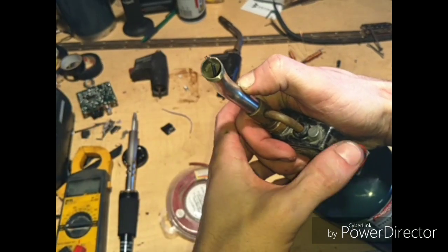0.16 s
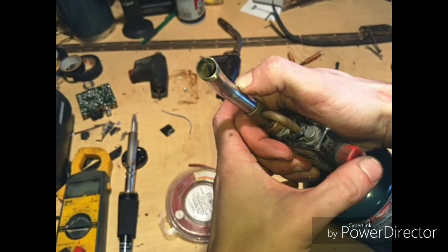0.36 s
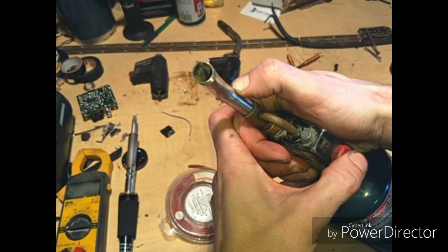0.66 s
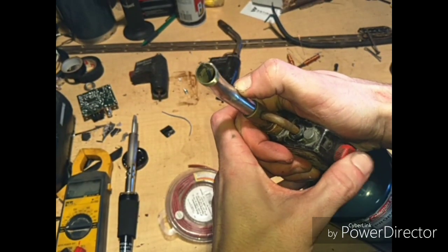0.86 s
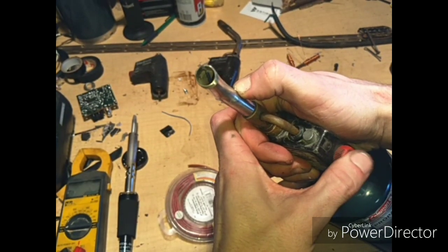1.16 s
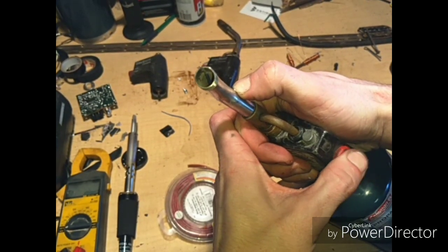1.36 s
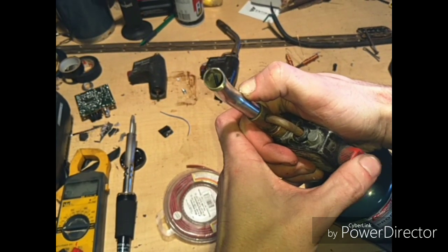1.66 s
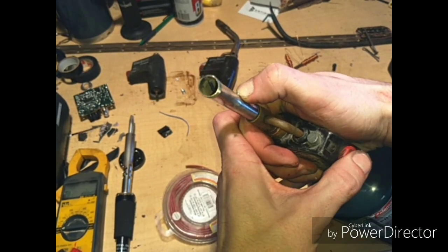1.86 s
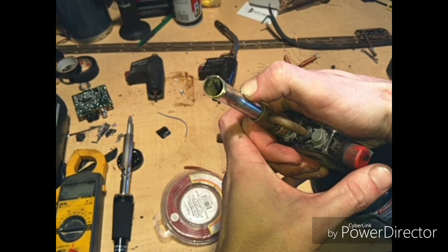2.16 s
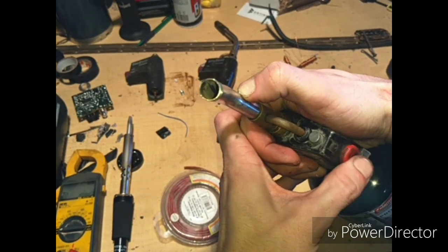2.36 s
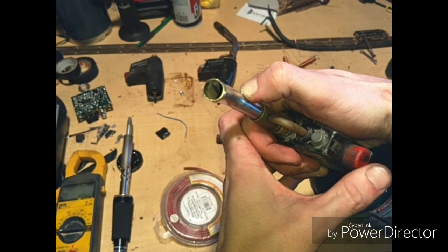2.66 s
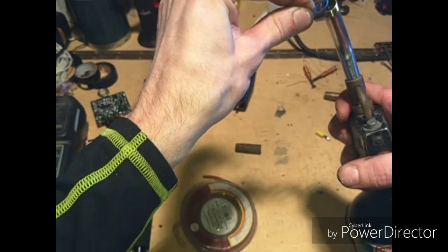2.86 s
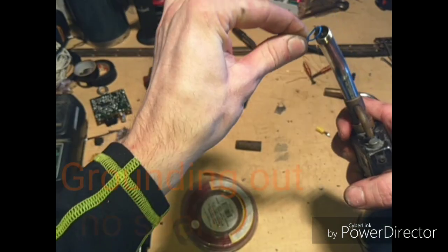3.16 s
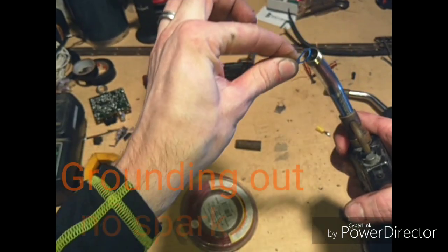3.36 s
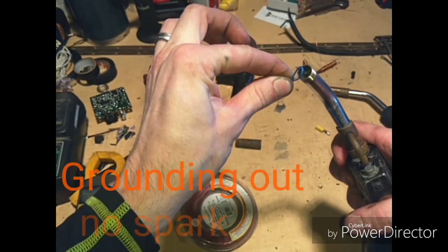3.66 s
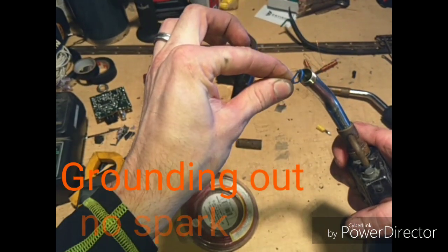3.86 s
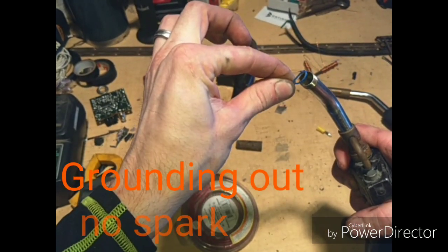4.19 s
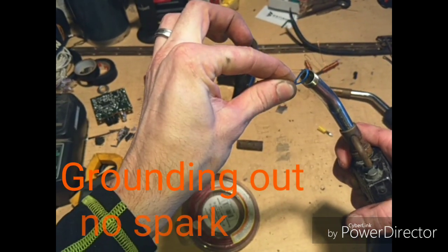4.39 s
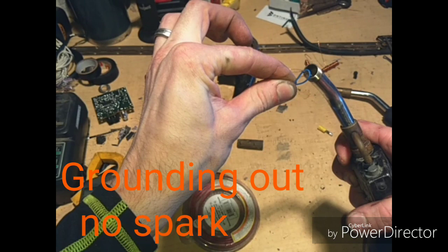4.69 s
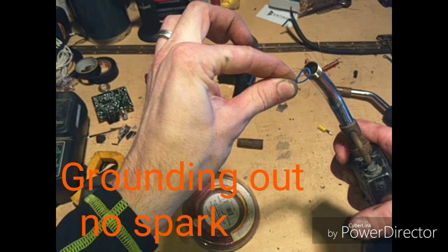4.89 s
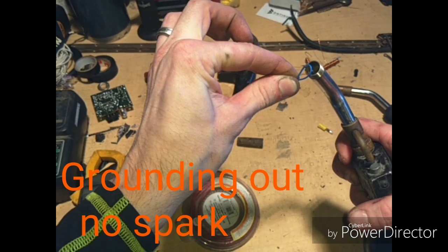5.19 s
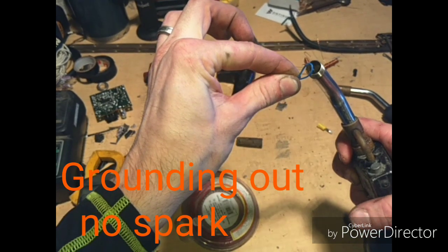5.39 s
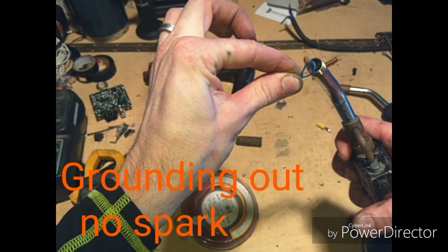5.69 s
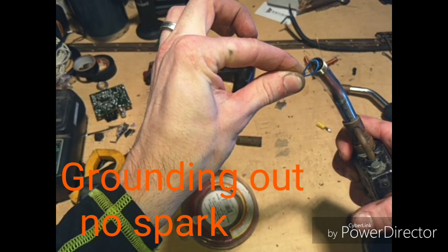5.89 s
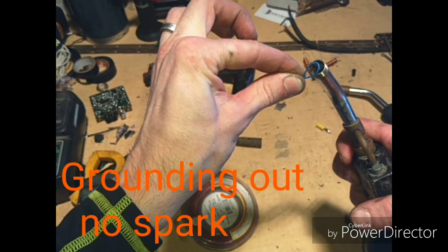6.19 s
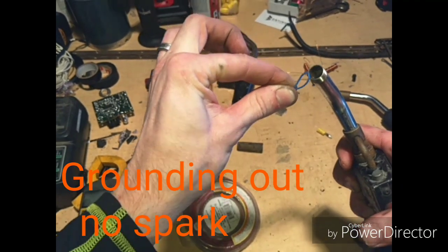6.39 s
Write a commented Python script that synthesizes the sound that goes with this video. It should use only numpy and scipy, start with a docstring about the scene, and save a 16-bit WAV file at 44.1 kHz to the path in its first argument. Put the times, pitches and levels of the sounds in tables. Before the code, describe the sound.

Handheld gas torch triggered seven times on a workbench, each pull a plastic tick, a bright gas hiss and a hard igniter snap, over low shed hum.

```python
"""A shed rumbles and hums throughout; faint dull rings come first, then a hand torch is triggered seven times.
At each pull trigger parts tick, gas hisses down the burner tube as filtered noise and the spring igniter snaps.
In the first four pulls unlit gas also buffets the near microphone port; soft stirrings come mostly between
pulls. At 2.93 s the scene changes and the torch is held over the workbench instead of close; two far knocks
sound before the fifth pull. Two ports are crossed into left and right, and loud treble pulls down a gain
control."""
import sys
import numpy as np
from scipy import signal
from scipy.fft import rfft, irfft
from scipy.io import wavfile
from scipy.ndimage import uniform_filter1d

SR = 44100
rng = np.random.default_rng(int(sys.argv[2]) if len(sys.argv) > 2 else 0)


def pcm_store(signal):
    """Save signal as 16-bit PCM."""
    levels = np.round(np.clip(np.atleast_2d(signal), -1, 1) * 32767)
    wavfile.write(sys.argv[1], SR, levels.astype(np.int16).T)


N = 288414
CUT_S = 2.93   # the scene changes here: the torch is held elsewhere and the gain control starts afresh
PORT_LAG = 19   # samples sound needs between the ports

# Trigger pulls, one for each snap. Each row: valve opens in seconds, let go in seconds, build-up in seconds,
# hiss level set before the snap in dB, hiss level set after it in dB, lowest tube mode against that level in dB.
TRIGGER_PULLS = [(0.671, 1.062, 0.0086, -26.5, -27.5, -12), (1.187, 1.601, 0.013, -27.5, -31.5, -12.5),
                 (1.872, 2.15, 0.017, -28.5, -27.5, -11), (2.403, 2.668, 0.012, -27.5, -27.5, -12.5),
                 (4.178, 4.862, 0.012, -30.5, -32, -8.5), (5.201, 5.625, 0.013, -32, -31.5, -7.5),
                 (6.065, 6.448, 0.016, -30.5, -34.5, -9)]
# Igniter snaps. Each row: strike in seconds, level in dB, rattle centre in Hz, fall by 60 dB in seconds,
# low clack against the level in dB, far port against near in dB, pressure pop in dB.
IGNITER_SNAPS = [(0.8421, -2, 6800, 0.0098, -12, -4.5, -46), (1.4223, -3, 8200, 0.012, -11, -7, -53),
                 (1.9381, 0.5, 10800, 0.0075, -11, -1.5, -51), (2.457, -3, 6060, 0.016, -7, -10, -54),
                 (4.641, -5.5, 9900, 0.018, -13, -10, -27), (5.399, -4, 8800, 0.011, -15, -28, -30),
                 (6.217, -6.5, 9900, 0.013, -5, 0, 7.5)]
# Ringing of the plastic grip. Each row: pitch in Hz, level in dB, fall by 60 dB in seconds.
GRIP_MODES = [(774, -3.5, 0.0052), (1130, -14, 0.047), (1565, -1, 0.0049), (3230, -22.5, 0.015)]


def from_db(db):
    """Decibels to gain."""
    return 10 ** (np.asarray(db) / 20)


def coloured(hz, db, channels):
    """Noise with the given dB per Hz, interpolated over log frequency."""
    f = np.maximum(np.fft.rfftfreq(N, 1 / SR), 1)
    gain = from_db(np.interp(np.log(f), np.log(hz), db)) * np.sqrt(SR / 2)
    return irfft(rfft(rng.standard_normal((channels, N))) * gain, N)


def resonate(x, hz, width_hz):
    """Two-pole resonance, gain about 1 on top."""
    r = np.exp(-np.pi * width_hz / SR)
    feedback = [1, -2 * r * np.cos(2 * np.pi * hz / SR), r * r]
    return signal.lfilter([(1 - r * r) / 2, 0, (r * r - 1) / 2], feedback, x)


def ring(hz, t60, size):
    """A decaying sine that starts from height 1 and falls 60 dB in t60 seconds."""
    t = np.arange(size) / SR
    return np.sin(2 * np.pi * hz * t) * from_db(-60 * t / t60)


def grip_ring(size):
    """The modes of the plastic grip, struck together."""
    return sum(from_db(db) * ring(hz, t60, size) for hz, db, t60 in GRIP_MODES)


def add(out, s, sound):
    """Mix a sound in at a time in seconds."""
    i = round(s * SR)
    out[..., i:i + sound.shape[-1]] += sound[..., :N - i]


def shed():
    """Steady rumble, partly alike at both ports, under the steady sines of mains and motor hum."""
    # Each row: frequency in Hz, noise alike at both ports in dB per Hz, noise of each port's own in dB per Hz.
    shed_noise = [(31.6, -80, -81), (70, -71.5, -93), (121, -78, -82.5), (214, -82, -88.5), (356, -88, -92),
                  (600, -96, -90.5), (960, -102, -97.5), (1350, -112, -100), (3000, -119, -103),
                  (6170, -121, -105), (9350, -124, -108), (13600, -124, -102), (16100, -129, -110)]
    # Each row: pitch in Hz, level in dB as heard in the middle, where crossing the ports thins the bass.
    hum_tones = [(118.4, -68), (242.2, -68.5), (360.7, -64.5), (414.5, -75), (479.1, -64.5), (651.4, -58.5),
                 (710.6, -88)]
    hz, alike_db, own_db = np.transpose(shed_noise)
    t = np.arange(N) / SR
    hum = np.zeros(N)
    for tone_hz, db in hum_tones:
        make_up = 1 / (2 * np.sin(np.pi * tone_hz * PORT_LAG / SR))   # undoes the thinning
        hum += from_db(db) * make_up * np.sin(2 * np.pi * (tone_hz * t + rng.random()))
    return coloured(hz, alike_db, channels=1) + coloured(hz, own_db, channels=2) + hum


def clonks():
    """Faint dull rings, decaying sines with a softened start, alike at both ports."""
    # Each row: start in seconds, pitch in Hz, level in dB, fall by 60 dB in seconds.
    dull_rings = [(0.368, 308, -48.5, 0.74), (0.451, 429, -45, 0.3)]
    out = np.zeros((2, N))
    soft_start = np.minimum(np.arange(20000) / 900, 1)
    for s, hz, db, t60 in dull_rings:
        add(out, s, from_db(db) * ring(hz, t60, size=20000) * soft_start)
    return out


def ticks():
    """Each tick is a short knock of its own pitch, the ring of the plastic grip and a rattle of the steel latch."""
    # Each row: start in seconds, level in dB, steel rattle in dB, knock pitch in Hz.
    trigger_ticks = [(0.572, -49, -26, 1100), (0.576, -43, -24, 1000), (0.642, -35, -24, 1130),
                     (0.654, -36, -19, 616), (0.993, -33, 5, 1270), (1.067, -29, 4, 1180),
                     (1.155, -37.5, 5, 950), (1.173, -34, -23, 1120), (1.181, -30, -9, 1150),
                     (1.597, -32.5, -11, 1230), (1.707, -42, -24, 1080), (1.847, -40.5, -14, 1180),
                     (1.858, -42, -5, 643), (2.152, -28.5, 5, 1120), (2.368, -45.5, -10, 1110),
                     (2.389, -30.5, -9, 1170), (2.7, -28.5, 9.5, 921), (2.72, -34, -17, 1300),
                     (4.969, -27.5, 2.5, 990), (5.211, -45, 0, 1360), (5.754, -29, 1, 1060),
                     (6.049, -51, -9, 633), (6.073, -48, 0, 1280), (6.487, -31, -3, 710)]
    latch_hz, latch_width_hz, latch_t60_s, tail_t60_s = 7400, 8400, 0.0067, 0.077
    grip_share_db = 4
    out, t = np.zeros((2, N)), np.arange(2000) / SR
    grip = from_db(grip_share_db) * grip_ring(size=2000)
    latch_fade = from_db(-60 * t / latch_t60_s) + 0.13 * from_db(-60 * t / tail_t60_s)
    onset = np.minimum(t / 0.00035, 1)
    for s, db, rattle_db, hz in trigger_ticks:
        noise = rng.standard_normal((2, len(t)))
        rattle = resonate(noise, latch_hz, latch_width_hz) * from_db(rattle_db) * latch_fade
        knock = 2.0 * ring(hz, 4.6 / hz, size=2000)
        add(out, s, from_db(db) * (onset * (knock + grip) + 1.7 * rattle))
    return out


def pull_gains(lead_s, extra_build_s, emptying_db_s):
    """Gain of each pull: builds up, changes to its second set level at the snap, sags, falls away after letting go."""
    knee_s, sag_db_s = 0.026, 2   # soft knee at letting go; the supply sags a little while the valve is open
    t, gains = np.arange(N) / SR, []
    for (opens, let_go, build_s, before_db, after_db, _), (snap_s, *_) in zip(TRIGGER_PULLS, IGNITER_SNAPS):
        since = np.maximum(t - opens + lead_s, 0)
        fall_db = emptying_db_s * knee_s * np.logaddexp(0, (t - let_go) / knee_s)
        level_db = np.where(t < snap_s, before_db, after_db) - sag_db_s * since - fall_db
        build_up = (1 - np.exp(-since / (build_s + extra_build_s))) ** 2
        gains.append(build_up * from_db(level_db))
    return np.array(gains)


def gas():
    """Jet noise through the tube modes, only partly alike at the two ports; a weaker hiss loses its top first."""
    # Burner tube and nozzle. Each row: mode in Hz, width in Hz, level held close in dB,
    # level held over the bench in dB, both levels at full hiss.
    tube_modes = [(2247, 254, -11.5, -13), (3047, 150, -10, -6.5), (4210, 770, -22, -9.5),
                  (4710, 216, -4.5, 8), (5580, 1190, -8, -2), (6170, 350, -3.5, 4), (6910, 460, -2, 0),
                  (7430, 146, -2, 1.5), (7830, 217, -7, -10), (9110, 400, -14.5, -4.5),
                  (11720, 1480, -10, -5.5), (12420, 250, -11.5, -15), (14700, 1700, -18, -19),
                  (15100, 780, -35, -28)]
    low_hz, low_width_hz = 1315.6, 79
    jet_bed_db, jet_db, far_trim_db = -31, 10, -2.5
    full_hiss_db, dulling = -30.5, 0.3   # dulling: dB per octave for each dB below full hiss
    hiss = pull_gains(lead_s=0, extra_build_s=0, emptying_db_s=233).sum(axis=0)
    # the lowest mode speaks first and dies last
    low_gains = pull_gains(lead_s=0.0069, extra_build_s=0.0068, emptying_db_s=140)
    drone = from_db(np.array(TRIGGER_PULLS)[:, -1]) @ low_gains
    t = np.arange(N) / SR
    jet = rng.standard_normal((2, N))
    jet[1] = 1.4 * jet[1] + .5 * np.roll(jet[0], 1)   # partly the same wave, a moment later

    bright = from_db(jet_bed_db) * resonate(jet, 9100, 6000)
    slack_db = np.clip(20 * np.log10(hiss + 1e-9) - full_hiss_db, -30, 0)
    for k, (hz, width_hz, close_db, bench_db) in enumerate(tube_modes):
        place_db = np.where(t < CUT_S, close_db, bench_db)
        gain = from_db(place_db + dulling * slack_db * np.log2(hz / 5000))
        bright = bright + (-1) ** k * gain * resonate(jet, hz, width_hz)   # neighbours in opposite phase
    low = resonate(resonate(jet, low_hz, low_width_hz), low_hz, 620)
    both = from_db(jet_db) * bright * hiss + low / low.std() * drone

    flutter = uniform_filter1d(rng.standard_normal(N), size=300)   # turbulence makes the jet slightly grainy
    return both * from_db(0.28 * flutter / flutter.std() + [[0], [far_trim_db]])


def puffs():
    """Every gas eddy swings the near port's membrane through a few slowing cycles and leaves a rolling rumble."""
    # Strong eddies at the near port. Each row: peak in seconds, level in dB, swing before it slows in about Hz.
    eddies = list([(0.836, -15, 104.7), (0.849, -25, 103), (0.932, -21, 165), (1.036, -21, 152),
                   (1.061, -24, 88.4), (1.121, -28, 143), (1.355, -22, 109), (1.369, -24.5, 102),
                   (1.407, -13.5, 133), (1.538, -17.5, 139), (1.566, -19.5, 106), (1.584, -19, 80.4),
                   (1.692, -14.5, 127), (2.014, -6.5, 110), (2.031, -10, 99), (2.075, -13.5, 72),
                   (2.116, -8, 124), (2.173, -26.5, 88), (2.54, -13, 108), (2.57, -18, 129),
                   (2.593, -14, 105), (2.619, -19.5, 82), (2.677, -24.5, 94), (2.695, -23.5, 83.4),
                   (2.721, -24, 88), (2.768, -24.5, 94)])
    # each drags a weak, slow eddy after it
    trail_s, trail_db, trail_spread_db, trail_hz = 0.11, -16.5, 5, 82
    out, t = np.zeros(N), np.arange(-600, 5000) / SR
    rise, after = np.exp(-(np.minimum(t, 0) / 0.007) ** 2), np.maximum(t, 0)
    trails = []
    for (s, db, _), (late, size, pitch) in zip(eddies, rng.random((len(eddies), 3))):
        start = s + trail_s * (.5 + late)
        level_db = db + trail_db + trail_spread_db * (2 * size - 1)
        trails.append((start, level_db, trail_hz * (.75 + pitch / 2)))
    for (s, db, hz), turn in zip(eddies + trails, rng.random((2 * len(eddies), 1))):
        slowing_hz = hz * (0.63 + 0.36 * np.exp(-after / 0.009))
        swing = 1.31 * np.sin(2 * np.pi * (np.cumsum(slowing_hz) / SR + turn)) * np.exp(-after * hz)
        rumble = 15.0 * resonate(resonate(rng.standard_normal(len(t)), 53, 68), 51, 160)
        add(out, s + t[0], from_db(db) * rise * (swing + rumble * np.exp(-after / 0.02)))
    return signal.sosfilt(signal.butter(3, 380, fs=SR, output="sos"), out)


def snaps():
    """The hammer slips, strikes and rattles for a few ms; a pop of pressure reaches the near port."""
    slip_s = .003   # from the start of the rattle to the strike
    out, t = np.zeros((2, N)), np.arange(1500) / SR
    after = np.arange(5000) / SR
    # a step of pressure, then the membrane settles
    pop = np.exp(-after / 0.0017) - 0.87 * ring(71, 0.055, size=5000) - 0.053 * ring(190, 0.065, size=5000)
    clack = grip_ring(size=1500)
    for s, level_db, ring_hz, t60, clack_db, far_db, pop_db in IGNITER_SNAPS:
        slip = np.exp(-((slip_s - t) / 0.0005) ** 2)
        strike = np.where(t < slip_s, slip, from_db(-60 * (t - slip_s) / t60))
        rattle = rng.standard_normal((2, len(t))) * strike
        bright = resonate(rattle, ring_hz, 3300) + 0.44 * resonate(rattle, 5300, 13000)
        # level is the loudest millisecond at each port
        bright = bright / np.sqrt(uniform_filter1d(bright ** 2, size=44).max(axis=1, keepdims=True))
        add(out, s - slip_s, bright * from_db([[level_db], [level_db + far_db]]))
        add(out, s, from_db(level_db + clack_db) * clack)
        add(out[0], s, from_db(pop_db) * pop)
    return out


def stirs():
    """Soft low stirrings nearby: short swells of dull noise, different at each port."""
    # Each row: start in seconds, length in seconds, level in dB, centre in Hz.
    stirrings = [(1.711, 0.13, -48, 307), (3.197, 0.12, -45, 81.5), (5.087, 0.047, -42, 79.5),
                 (5.131, 0.083, -47, 88.6), (5.197, 0.048, -51, 79)]
    out = np.zeros((2, N))
    for s, length, db, hz in stirrings:
        swell = np.hanning(round(length * SR)) ** .5
        noise = resonate(resonate(rng.standard_normal((2, len(swell))), hz, hz), hz, hz)
        add(out, s, from_db(db) * swell * noise / noise.std())
    return out


def knocks():
    """Something heavy is set down far off; its blow, scattered by the shed, sets wooden modes ringing."""
    # Each row: start in seconds, level in dB, rise in seconds, decay time of the scatter in seconds.
    far_knocks = [(3.693, -43.5, 0.015, 0.041), (3.915, -42, 0.0034, 0.041)]
    # What the knocks ring with. Each row: mode in Hz, width in Hz, level in dB.
    wood_modes = [(115, 24, 4.5), (217, 28, 4), (295, 31, 6), (396, 25, 3.5), (467, 51, -9),
                  (580, 160, -10), (718, 32, -4), (770, 49, -19.5), (954, 200, -16)]
    own_db, tail_db, tail_s = -4.5, -10, 0.11   # own: each port's share of unlike noise
    t, level = np.arange(N) / SR, np.zeros(N)
    for s, db, rise, scatter in far_knocks:
        after = np.maximum(t - s, 0)
        fade = np.exp(-after / scatter) + from_db(tail_db) * np.exp(-after / tail_s)
        level += from_db(db) * fade * np.minimum(after / rise, 1)
    out = np.zeros((2, N))
    for hz, width_hz, db in wood_modes:
        ringing = resonate(rng.standard_normal((3, N)) * level, hz, width_hz)
        alike, near, far = ringing * np.sqrt(SR / width_hz / np.pi)   # evens out wide and narrow modes
        out += from_db(db) * (alike + from_db(own_db) * np.array([near, far]))
    return signal.sosfilt(signal.butter(4, 1050, fs=SR, output="sos"), out)   # distance takes the treble


def scene():
    """Pressure at the near and the far port."""
    near_only = np.array([[1], [0]])
    return shed() + clonks() + ticks() + gas() + puffs() * near_only + snaps() + stirs() + knocks()


def gain_control(ports):
    """Treble peaks over the threshold at the near port pull the gain down at once; it creeps back steadily."""
    start_db, restart_db, threshold_db, release_db_s = -8.5, -6, -19, 9   # the first two: gain at each start
    treble = signal.sosfilt(signal.butter(2, 2000, "high", fs=SR, output="sos"), ports[0])
    over = 10 * np.log10(uniform_filter1d(treble ** 2, size=44) + 1e-12) - threshold_db
    cut, held = round(CUT_S * SR), []
    for part, memory_db in ((over[:cut], start_db), (over[cut:], restart_db)):
        ramp = release_db_s * np.arange(len(part)) / SR
        # a running peak that leaks by the ramp
        held.append(np.maximum.accumulate(np.maximum(part + ramp, -memory_db)) - ramp)
    reduction_db = np.maximum(np.concatenate(held), 0)
    return from_db(-uniform_filter1d(reduction_db, size=30))


def record(dry):
    """Gain control and circuit hiss, then each side is one port minus the other, delayed; last a top cut."""
    self_noise_db, port_edge_hz, right_db, cutoff_hz = -73, 15600, -.7, 16800
    circuit_hiss = from_db(self_noise_db) * resonate(rng.standard_normal((2, N)), 5900, 9000)
    ports = dry * gain_control(dry) + circuit_hiss
    late = np.pad(ports, ((0, 0), (PORT_LAG, 0)))[::-1, :N]   # the opposite port, delayed
    crossed = (ports - late) * from_db([[0], [right_db]])
    sides = signal.sosfilt(signal.butter(4, port_edge_hz, fs=SR, output="sos"), crossed)
    return signal.sosfilt(signal.cheby2(12, 70, cutoff_hz, fs=SR, output="sos"), sides)


dry = scene()
out = record(dry)
pcm_store(out)
```